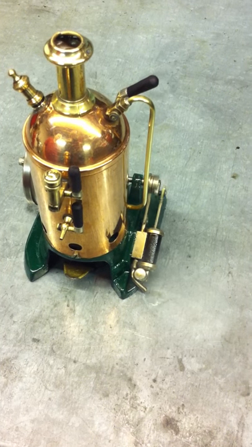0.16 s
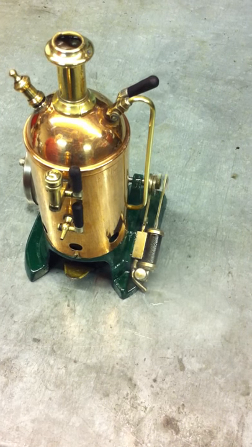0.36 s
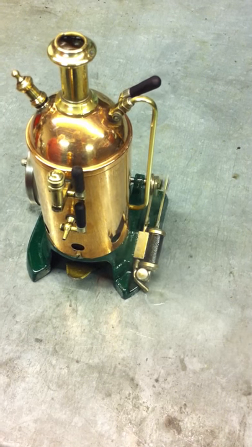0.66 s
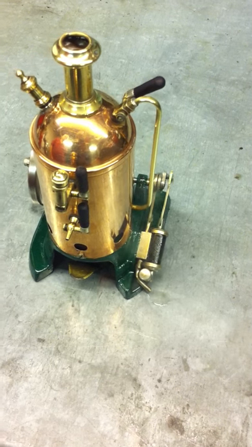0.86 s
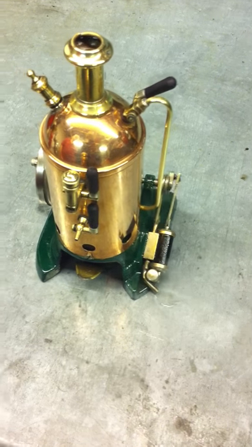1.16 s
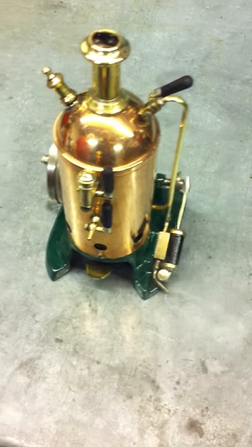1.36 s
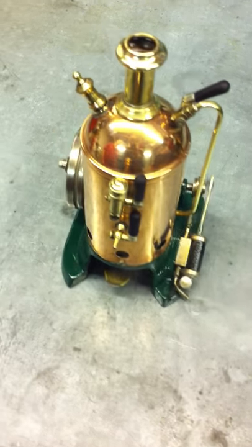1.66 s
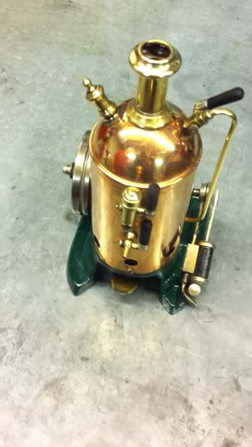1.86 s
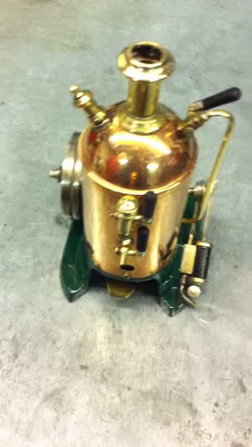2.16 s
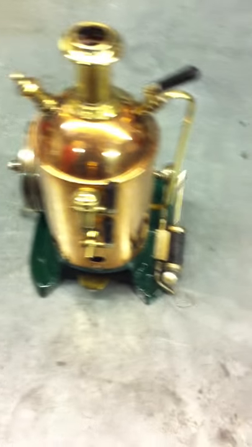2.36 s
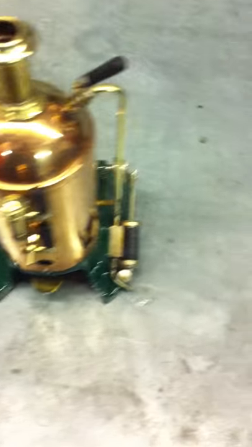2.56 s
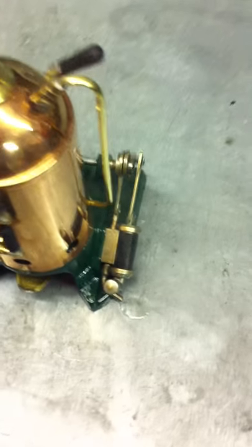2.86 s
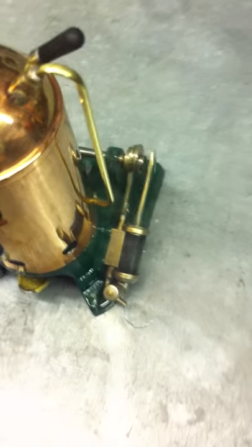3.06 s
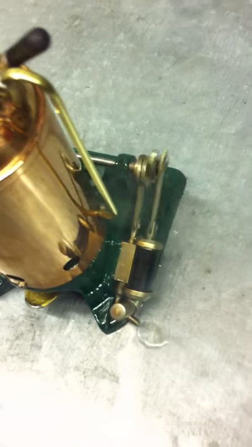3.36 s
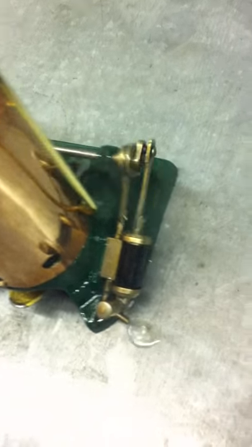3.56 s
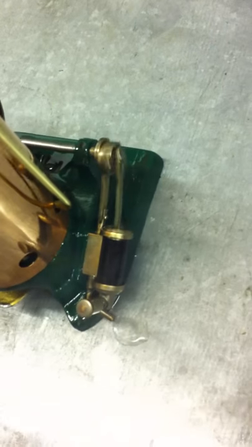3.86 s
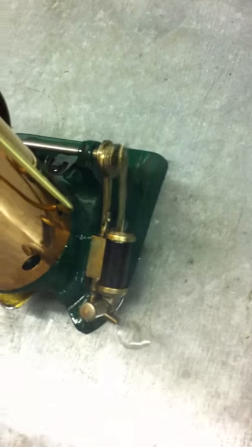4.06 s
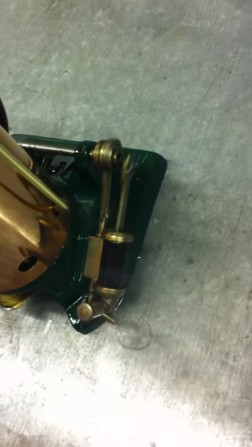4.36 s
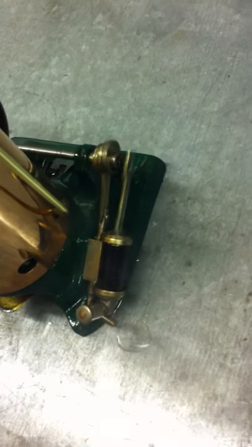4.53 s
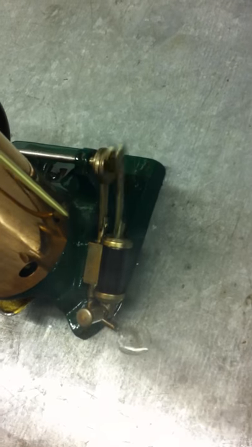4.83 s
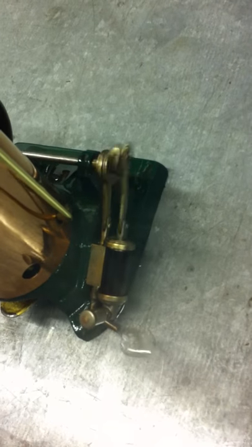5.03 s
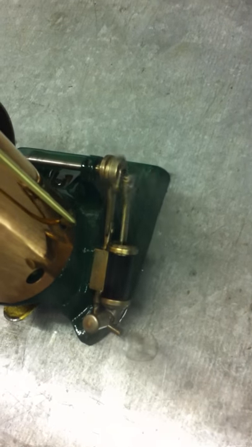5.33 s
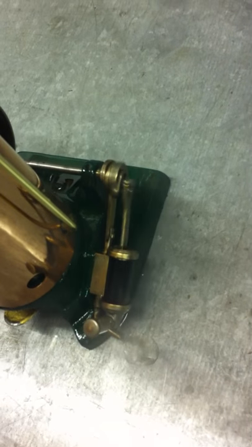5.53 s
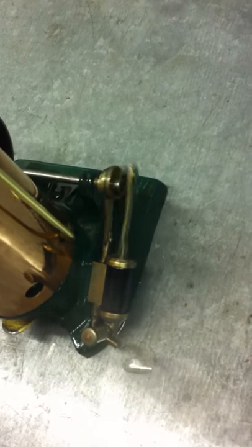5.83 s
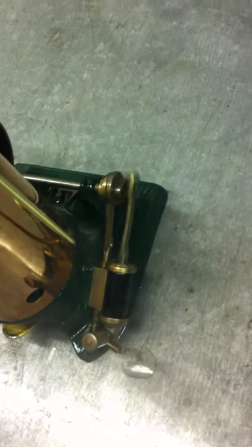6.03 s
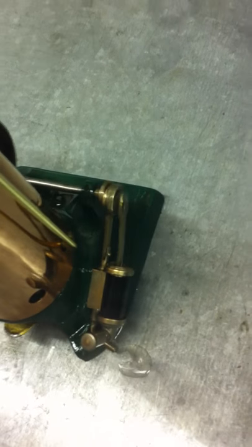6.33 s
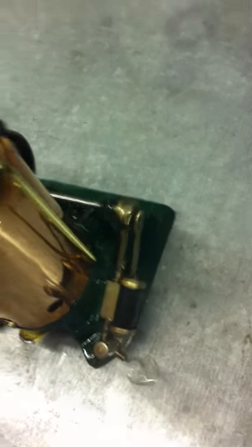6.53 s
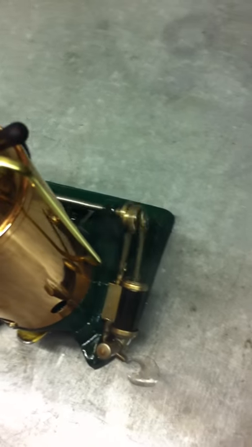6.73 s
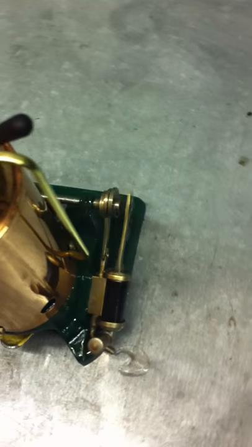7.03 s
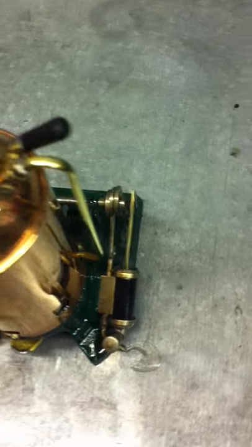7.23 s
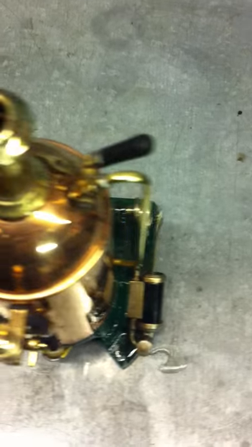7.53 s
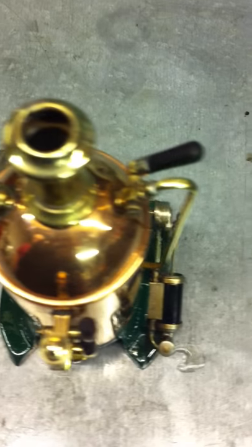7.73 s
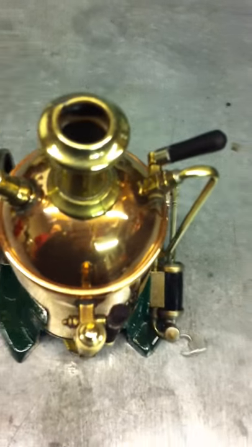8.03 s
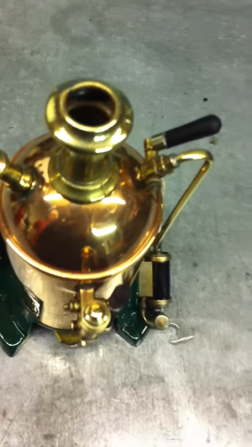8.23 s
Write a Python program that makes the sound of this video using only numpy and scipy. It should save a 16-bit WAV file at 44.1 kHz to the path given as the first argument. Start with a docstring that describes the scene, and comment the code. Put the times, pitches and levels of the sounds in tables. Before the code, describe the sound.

A small brass steam engine is already running at 0 s, heard close in a workshop with short, faint reflections. About six and a half times a second comes a tiny valve tap, a short breathy puff with a hollow pipe note around 1.4 kHz, then a dry, rattling metal knock with a bright ring. Soft leaking hiss and a faint low metallic hum continue underneath. From 2 to 3.5 s the beat eases and the microphone moves towards the cylinder. One soft low gust and four quick watery pops come with the puffs around 3.5-4.1 s. The puffs are fuller thereafter, strongest near 6-6.8 s, while knocks soften slightly. Stray light linkage ticks appear at odd moments. Three more wet pops spit at 7.0-7.4 s. The view returns to the boiler, puffs weaken, and the engine still runs at about five beats a second at the end, around 8.4 s.

```python
"""A small brass steam engine chuffs and knocks quickly, slowing from about six to five turns a second.
Each turn the valve taps, noise shaped as exhaust steam swells and falls with a pipe note, and the slack rod
knocks, ringing the modes of frame, pins and base. Water pops, stray ticks and one soft low gust are scattered in.
Under them leaking steam hisses as coloured noise, and friction noise keeps the base modes humming.
The balance follows a listening place moving between the boiler side and above the cylinder."""
import sys
import numpy as np
from scipy import signal
from scipy.fft import rfft, irfft
from scipy.io import wavfile
from scipy.ndimage import uniform_filter1d

SR = 44100
rng = np.random.default_rng(int(sys.argv[2]) if len(sys.argv) > 2 else 0)


def master(y):
    """Save y as 16-bit WAV."""
    cut = np.clip(np.atleast_2d(y).T, -1, 1)
    pcm = np.round(cut * 32767)  # scale
    wavfile.write(sys.argv[1], SR, pcm.astype(np.int16))


N = 369999
LEAD_SAMPLES = SR // 10  # rendered before time zero

# Turns of the crank. Each row: rod knock in seconds, knock level in dB, level of the puff before it in dB,
# rise of the puff in seconds.
CRANK_TURNS = [(0.1447, -36, -45, 0.015), (0.2982, -36.5, -46.5, .011), (0.4506, -37, -46, 0.017),
               (0.6041, -37, -44.5, 0.018), (.7608, -36, -44.5, .014), (0.9162, -36, -44.5, 0.012),
               (1.0727, -36.5, -45.5, 0.0073), (1.2275, -38, -45.5, 0.013), (1.3852, -36.5, -43, 0.018),
               (1.5412, -37.5, -46.5, 0.015), (1.7021, -37, -44.5, 0.012), (1.8648, -37.5, -48.5, 0.015),
               (2.0294, -35.5, -46, 0.0081), (2.1998, -37, -46, 0.012), (2.3677, -37.5, -49.5, 0.017),
               (2.5439, -38, -45.5, 0.012), (2.7153, -38.5, -50, 0.02), (2.8962, -38, -46, 0.012),
               (3.0701, -38, -46.5, 0.017), (3.248, -39, -42.5, 0.0098), (3.4302, -39.5, -44.5, 0.014),
               (3.608, -38, -43.5, 0.014), (3.789, -39, -43.5, 0.011), (3.975, -37.5, -40.5, 0.0095),
               (4.1575, -37.5, -40, 0.0075), (4.3429, -37.5, -41, 0.01), (4.53, -36, -43, 0.012),
               (4.717, -36.5, -42, 0.009), (4.9044, -37, -42, 0.014), (5.0958, -37.5, -43.5, 0.0052),
               (5.281, -37, -42.5, 0.013), (5.4731, -37, -42.5, 0.009), (5.665, -37.5, -40.5, 0.015),
               (5.8553, -37, -39.5, 0.019), (6.049, -36, -38, 0.017), (6.2445, -38, -36, 0.013),
               (6.4411, -38, -38.5, 0.011), (6.6347, -38.5, -38, 0.01), (6.8344, -40, -39, 0.0072),
               (7.0333, -41, -39.5, 0.011), (7.231, -41.5, -41, 0.009), (7.436, -41.5, -44, 0.013),
               (7.639, -42, -45, 0.016), (7.8467, -41.5, -45, 0.016), (8.0544, -41, -44, 0.012),
               (8.2656, -40, -44.5, 0.012)]
# Colour over time. Each row: time in seconds, puff treble in dB, puff thump in dB, pipe pitch in Hz,
# knock treble in dB.
COLOUR_PATH = [(0.1, -48, -65, 1350, -43.5), (.9, -47, -54.5, 1403, -42), (1.6, -48, -57, 1294, -43.5),
               (2.15, -46.5, -61, 1350, -50), (2.7, -45, -56, 1410, -43.5), (3.45, -41.5, -60, 1380, -43.5),
               (3.9, -40.5, -64, 1336, -45), (4.4, -48.5, -62, 1430, -43), (4.9, -43, -53.5, 1440, -45),
               (5.6, -44.5, -57.5, 1430, -45.5), (6.8, -44.5, -55.5, 1400, -47),
               (7.17, -37.5, -53, 1390, -46), (7.5, -45, -50.5, 1406, -47.5), (8.3, -46, -52.5, 1710, -45)]
# Listening place. Each row: time in seconds, place from 0 (boiler side) to 1 (above the cylinder).
VIEW_PATH = [(0, 0.14), (2.2, 0), (3.5, 0.63), (6.5, 0.73), (8.4, 0.17)]
# Exhaust jet spectrum. Each row: frequency in Hz, relative level in dB.
JET_SPECTRUM = [(500, -6.5), (1100, -2), (1500, 2), (1850, 3), (2600, 3.5), (5000, 5.5), (6500, -2.5),
                (8000, -11.5), (12000, -38.5), (18000, -69)]
# Treble spectrum of the puff. Each row: frequency in Hz, relative level in dB.
FIZZ_SPECTRUM = [(4000, -16), (6500, -12.5), (8000, -3), (9500, 0), (11000, -9.5), (14000, -14),
                 (18000, -15.5)]
# Exhaust pipe resonances. Each row: multiple of the pipe pitch, width of each of two passes in Hz,
# relative level in dB.
PIPE_MODES = [(1.002, 350, 19.5), (1.45, 249, 12.5), (1.8, 390, 17), (2.4, 400, 10.5)]
# Rod meeting, rebounding and chattering. Each row: mean delay in seconds, mean level in dB.
ROD_CONTACTS = [(0, -9.5), (.0009, -3), (.0027, -11.5), (.0043, -6), (.0066, -20)]
# Modes of frame, pins and base. Each row: mean frequency in Hz, relative level in dB from the boiler side,
# relative level in dB from above the cylinder, t60 in seconds (the hum ignores it).
FRAME_MODES = [(1284, -30.5, -23, 0.13), (1640, -30.5, -13.5, 0.053), (2156, -9.5, -3.5, 0.0077),
               (2590, -3.5, -0.5, 0.0035), (2974, -19.5, -9.5, 0.011), (3850, -11, -11, .018),
               (4110, 0, -13, .02), (4360, -2, -12, .016), (4680, -6, -1, .019), (5050, -4, 2, .02),
               (5370, 0, -2, 0.011), (5835, 1, -5.5, 0.015)]
PIN_MODES = [(6314, 0.5, 0, 0.015), (7400, -2, -6, 0.032), (7580, -2, -29, 0.0097), (8060, 3, 3.5, 0.018),
             (8630, 1.5, 3.5, 0.015), (9470, -3.5, 2, 0.014), (9430, -17, -5, 0.016),
             (12950, -14, 0, 0.0028)]
BASE_MODES = [(671.6, -1, -10.5, 0.054), (804.5, -1, 3.5, 0.043), (1022, -4.5, 0.5, 0.051)]
# Water slugs popping out with a puff. Each row: start in seconds, level in dB.
WATER_POPS = [(3.5433, -43), (3.727, -30), (3.913, -27), (4.091, -22), (6.9636, -28), (7.159, -24),
              (7.362, -32)]
# A soft low gust of air from one puff buffeting the microphone. The row: start in seconds, level in dB,
# centre in Hz, t60 in seconds.
PUFF_GUST = (3.541, -41, 280, .045)
# Stray ticks of the linkage. Each row: start in seconds, blow level in dB, base level in dB, treble level in dB.
LINKAGE_TICKS = [(2.9564, -68.5, -62, -65), (3.8367, -56, -65.5, -51), (4.386, -62.5, -67.5, -51),
                 (4.7975, -47.5, -44, -51), (6.2917, -61.5, -57, -50), (6.862, -50, -73, -54)]
# Steam leak spectrum. Each row: frequency in Hz, relative level in dB per Hz.
LEAK_SPECTRUM = [(12, -36), (20, 5), (51, -10), (179, 5.5), (430, -7), (799, 8), (1180, -2.5), (2420, -0.5),
                 (3470, 0), (5120, -2), (6790, -6), (9500, -2.5), (12400, -54.5), (20900, -120)]
# Steady hiss. Each row: time in seconds, mean leak level in dB, mean thin top hiss level in dB.
HISS_PATH = [(0.0, -59, -63), (0.93, -62, -64.5), (2.48, -60.5, -64.5), (3.11, -58.5, -61.5),
             (3.92, -58, -62), (6.47, -59, -62), (8.39, -61, -65)]
# Decay of the shop's reflections. Each row: frequency in Hz, t60 in seconds.
SHOP_DECAY = [(300, 0.51), (1000, 0.3), (4000, 0.17), (10000, 0.065)]

FIRST_KNOCK_S, FIRST_KNOCK_DB = -0.008, -38  # already ringing at the start
KNOCK_BASE_DB, KNOCK_SCATTER_DB = -46, 1.17  # mean push on the base, spread from turn to turn
EXHAUST_LEAD_TURNS = 0.392  # the exhaust opens this share of a turn before the knock
PUFF_TURNS, RISE_WEIGHT = 0.16, 0.39  # fall = share of a turn minus a part of the rise
PUFF_SCATTER_DB, JET_SCATTER_DB = 1.5, 1.8  # spread from puff to puff
PIPE_SCATTER = 0.025  # spread as a share of the pipe pitch
MODE_SCATTER = 0.007  # the loose frame never rings at quite the same pitch twice
HUM_DB, HUM_ABOVE_DB = -65, 2  # level, and gain above the cylinder
EDGE_HZ = 17600


def gain_of(db):
    """Decibels to gain."""
    return 10 ** (np.asarray(db) / 20)


def evened(x):
    """Scales to rms 1."""
    return x / np.sqrt(np.mean(x ** 2) + 1e-20)


def coloured(x, spectrum):
    """Filters by a (Hz, dB) spectrum, interpolated over log frequency."""
    point_hz, point_db = np.transpose(spectrum)
    hz = np.fft.rfftfreq(len(x), 1 / SR)
    db = np.interp(np.log(hz + 1), np.log(point_hz + 1), point_db)
    return irfft(rfft(x) * gain_of(db), len(x))


def resonate(x, hz, width_hz):
    """Two-pole resonance with gain 1 at its centre."""
    b, a = signal.iirpeak(hz, hz / width_hz, SR)
    return signal.lfilter(b, a, x)


def resonate_twice(x, hz, width_hz):
    """Two equal resonances in series: steeper skirts."""
    return resonate(resonate(x, hz, width_hz), hz, width_hz)


def highpass(x, hz):
    """Second-order bass cut."""
    return signal.sosfilt(signal.butter(2, hz, "high", fs=SR, output="sos"), x)


def add(mix, start_s, sound):
    """Mixes a sound in at its start time."""
    part = mix[LEAD_SAMPLES + round(start_s * SR):][:len(sound)]
    part += sound[:len(part)]


def chuff(row):
    """Turbulent steam with spitting droplets swells and falls; treble drops early, the pipe note outlasts the jet."""
    start_s, db, rise_s, fall_s, treble_db, thump_db, pipe_hz = row
    t = np.arange(SR // 8) / SR
    flow, spit, low, choke = rng.standard_normal((4, len(t)))
    swell = np.clip(t / rise_s, 0, 1)
    after = np.maximum(t - rise_s, 0) / fall_s

    drop_db = 3.9 * np.minimum(rng.exponential(1, len(t)), 3)
    drops = gain_of(drop_db) * (rng.random(len(t)) < 1200 / SR)  # about 1200 a second
    sputter = gain_of(2 * evened(uniform_filter1d(choke, SR // 300)))  # water chokes the flow unevenly
    steam = sputter * (flow + 0.353 * evened(drops * spit))

    pipe = sum(gain_of(mode_db) * resonate_twice(steam, multiple * pipe_hz, width_hz)
               for multiple, width_hz, mode_db in PIPE_MODES)
    pipe = gain_of(-6) * evened(pipe) * swell ** 6.7 * gain_of(-7.6 * after ** 1.5)

    jet_luck = rng.standard_normal(len(JET_SPECTRUM))
    tint = [(hz, jet_db + JET_SCATTER_DB * luck) for (hz, jet_db), luck in zip(JET_SPECTRUM, jet_luck)]
    jet = evened(coloured(steam, tint)) * swell ** 0.46 * gain_of(-10.5 * after ** 1.7)

    fizz = evened(coloured(steam, FIZZ_SPECTRUM)) * swell ** 0.22
    fizz = fizz * gain_of(treble_db - 12.2 * after ** 0.86)
    thump = evened(resonate(resonate(low, 464, 1040), 645, 1350))
    thump = thump * swell * gain_of(thump_db - 12.4 * after)
    puff = gain_of(db) * (pipe + jet) + fizz + thump
    return start_s, highpass(puff, 130)  # the narrow pipe radiates little deep bass


def ring(modes, view, luck, t, swing):
    """Dying sines balanced by listening place; each starts at swing times the one before (negative flips it)."""
    hz, side_db, above_db, t60_s = np.transpose(modes)[:, :, None]
    count = len(modes)
    hz = hz * (1 + MODE_SCATTER * luck[::-1][:count, None])
    db = side_db + view * (above_db - side_db) + luck[:count, None] - 60 * t / t60_s
    start = swing ** np.arange(count)[:, None]
    out = (start * gain_of(db) * np.sin(2 * np.pi * hz * t)).sum(0)
    return out / np.sqrt(np.mean(out[:SR // 300] ** 2))


def blow(row, contacts, chatter_db):
    """A cluster of contacts and faint chatter ring frame and pins; the heavy base feels one push."""
    start_s, db, base_db, treble_db = row
    t = np.arange(SR // 8) / SR
    view = np.interp(start_s, *np.transpose(VIEW_PATH))
    frame_luck, pin_luck, base_luck, delay_luck, contact_luck = rng.standard_normal((5, 12))
    frame = ring(FRAME_MODES, view, frame_luck, t, -0.91)
    pins = ring(PIN_MODES, view, pin_luck, t, -1.0)
    body = frame + gain_of(treble_db - db) * pins

    chatter = gain_of(chatter_db - 60 * t / 0.11) * rng.standard_normal(len(t))
    train = chatter.copy()
    for k, (delay_s, contact_db) in enumerate(contacts):
        at = round(abs(delay_s * (1 + 0.01 * delay_luck[k])) * SR)  # the play in the joint hardly changes
        train[at] += gain_of(contact_db + 1.2 * contact_luck[k])

    push = chatter + signal.unit_impulse(len(t))
    base = signal.fftconvolve(ring(BASE_MODES, view, base_luck, t, 0.93), push)
    sound = signal.fftconvolve(body, train) + gain_of(base_db - db) * base
    # many small loose parts
    rattle = gain_of(5.0 - 60 * t / 0.062) * resonate(rng.standard_normal(len(t)), 2270, 4070)
    sound[:len(t)] += rattle * train[:SR // 200].max()
    return start_s, gain_of(db) * highpass(sound, 330)  # small parts radiate little bass


def valve(chuff_s):
    """The slide valve creeps open with a thin hiss and taps the base just before the puff."""
    t = np.arange(SR // 20) / SR
    seep_db = -62 + 8.3 * np.interp(chuff_s, *np.transpose(VIEW_PATH)) + 0.58 * rng.random()
    seep = evened(resonate(rng.standard_normal(len(t)), 2730, 490)) * signal.windows.tukey(len(t), 0.6)
    tap_db = -70 + 0.9 * rng.random()
    tap = blow((chuff_s - 0.0145, tap_db, tap_db + 11, tap_db + 1), ROD_CONTACTS[:2], -22)
    return (chuff_s - 0.03, gain_of(seep_db) * seep), tap


def pop(start_s, db):
    """A slug of water bursts at the pipe mouth: a broad snap with a short spray."""
    t = np.arange(SR // 30) / SR
    snap = gain_of(-60 * t / 0.003)
    spray = gain_of(-22 - 60 * t / 0.06)
    burst = (snap + spray) * rng.standard_normal(len(t))
    return start_s, gain_of(db) * resonate(resonate(burst, 2900, 4200), 2900, 5000)


def gust(start_s, db, hz, t60_s):
    """Air from a puff buffets the microphone: a short burst of noise around one broad low resonance."""
    t = np.arange(SR // 8) / SR
    buffet = evened(resonate_twice(rng.standard_normal(len(t)), hz, 300))
    return start_s, gain_of(db - 60 * t / t60_s) * np.minimum(t / 0.0081, 1) * buffet


def steady():
    """Leaking steam as broad and thin top hiss, and shaft friction rubbing the base modes."""
    at_s, *levels = np.transpose(HISS_PATH)
    t = (np.arange(N + LEAD_SAMPLES) - LEAD_SAMPLES) / SR
    leak_db, top_db = (np.interp(t, at_s, level) for level in levels)
    leak, top, rub, lumps, flutter = rng.standard_normal((5, len(t)))

    breath_db = 1.27 * evened(uniform_filter1d(lumps[::-1], SR // 25))  # the leak swells and dips
    flutter_db = 1.3 * evened(uniform_filter1d(flutter, SR // 40))  # the top hiss flutters
    hiss = gain_of(leak_db + breath_db) * evened(coloured(leak, LEAK_SPECTRUM))
    hiss = hiss + gain_of(top_db + flutter_db) * evened(highpass(top, 9000))

    rub = rub * gain_of(3.5 * evened(uniform_filter1d(lumps, SR // 60)))  # uneven bearing drag
    view = np.interp(t, *np.transpose(VIEW_PATH))
    hum = sum(gain_of(side_db + view * (above_db - side_db)) * resonate(rub, hz, 60)
              for hz, side_db, above_db, _ in BASE_MODES)
    return hiss + gain_of(HUM_DB + HUM_ABOVE_DB * view) * evened(hum)


def shop(x):
    """Sparse reflections of random sign, each band dying at its own speed."""
    taps = np.zeros(SR // 2)
    at = np.arange(200, len(taps) - 20, 20)
    taps[at + rng.integers(0, 20, len(at))] = rng.choice([-1., 1.], len(at))
    hz, t, bands = signal.stft(taps, SR, nperseg=128)
    point_hz, point_t60_s = np.transpose(SHOP_DECAY)
    t60_s = np.interp(np.log(hz + 1), np.log(point_hz), point_t60_s)[:, None]
    tail = signal.istft(bands * gain_of(-60 * t / t60_s), SR, nperseg=128)[1]
    return signal.fftconvolve(x, tail / np.linalg.norm(tail))[:len(x)]


def turns():
    """Knock and puff rows for every turn; puff timing and length follow the time a turn takes."""
    knock_s, knock_db, puff_db, rise_s = np.transpose(CRANK_TURNS)
    turn_s = np.diff(knock_s, prepend=FIRST_KNOCK_S)
    at_s, *columns = np.transpose(COLOUR_PATH)
    treble_db, thump_db, pipe_hz, pins_db = (np.interp(knock_s, at_s, column) for column in columns)
    luck = rng.standard_normal((5, len(knock_s)))

    knocks = zip(knock_s, knock_db,
                 KNOCK_BASE_DB + KNOCK_SCATTER_DB * luck[0],
                 pins_db + KNOCK_SCATTER_DB * luck[1])
    puffs = zip(knock_s - EXHAUST_LEAD_TURNS * turn_s, puff_db, rise_s,
                PUFF_TURNS * turn_s - RISE_WEIGHT * rise_s,
                treble_db + PUFF_SCATTER_DB * luck[2],
                thump_db + PUFF_SCATTER_DB * luck[3],
                pipe_hz * (1 + PIPE_SCATTER * luck[4]))
    first_knock = (FIRST_KNOCK_S, FIRST_KNOCK_DB, KNOCK_BASE_DB, pins_db[0])
    return [first_knock, *knocks], puffs


def scene():
    """Engine sounds, their reflections and the steady bed."""
    engine = np.zeros(N + LEAD_SAMPLES)
    knocks, puffs = turns()
    for row in puffs:
        add(engine, *chuff(row))
        for sound in valve(row[0]):
            add(engine, *sound)
    for row in knocks:
        add(engine, *blow(row, ROD_CONTACTS, -32))
    for row in WATER_POPS:
        add(engine, *pop(*row))
    add(engine, *gust(*PUFF_GUST))
    for row in LINKAGE_TICKS:
        add(engine, *blow(row, ROD_CONTACTS[1:2], -57.0))
    mix = engine + gain_of(-15.5) * shop(engine) + steady()
    return mix[None, LEAD_SAMPLES:]


def record(dry):
    """Linear-phase lowpass at the upper band edge."""
    lowpass = signal.firwin(511, EDGE_HZ, window=("kaiser", 9), fs=SR)
    return signal.oaconvolve(dry, lowpass[None], "same")


dry = scene()
out = record(dry)
master(out)
```